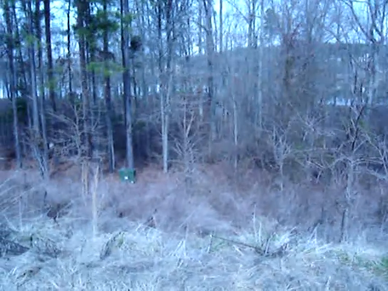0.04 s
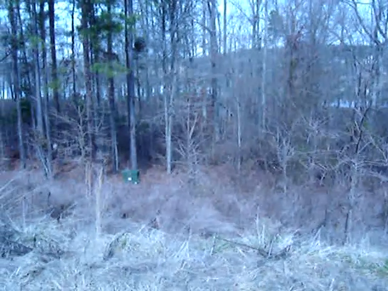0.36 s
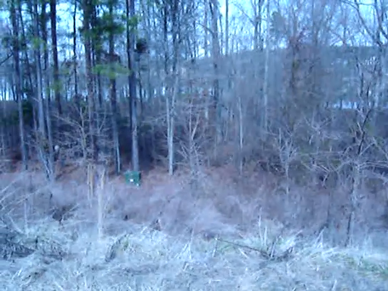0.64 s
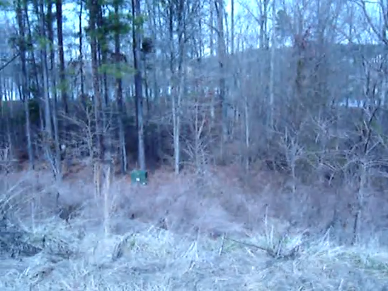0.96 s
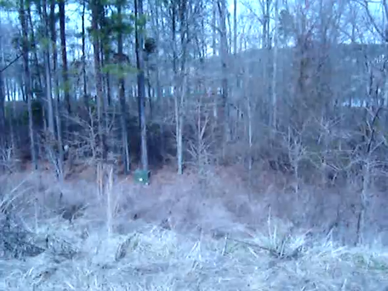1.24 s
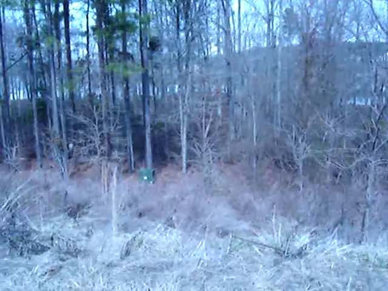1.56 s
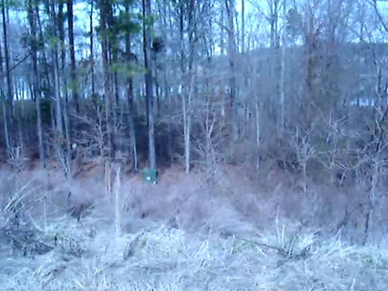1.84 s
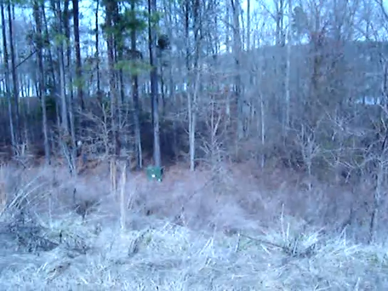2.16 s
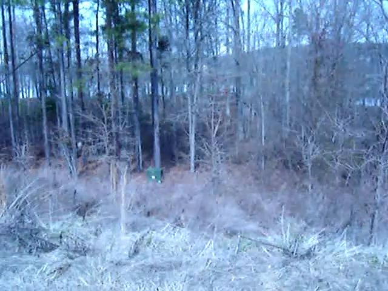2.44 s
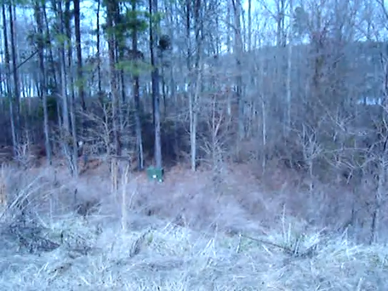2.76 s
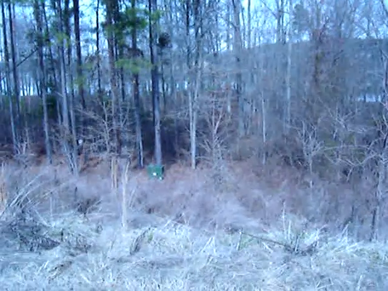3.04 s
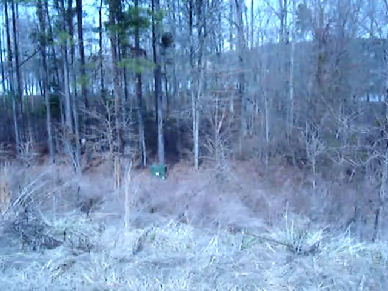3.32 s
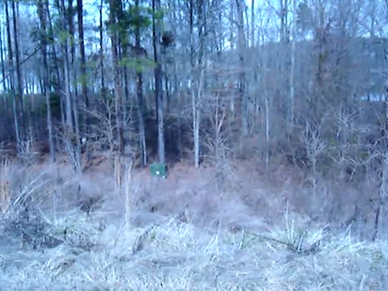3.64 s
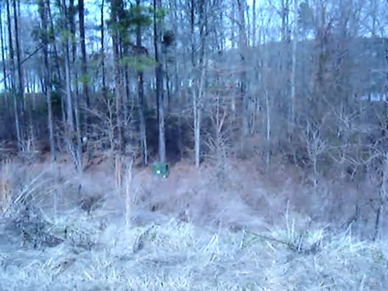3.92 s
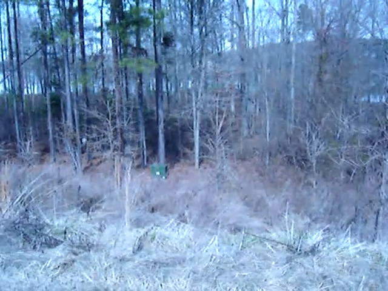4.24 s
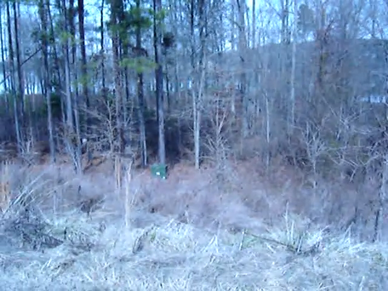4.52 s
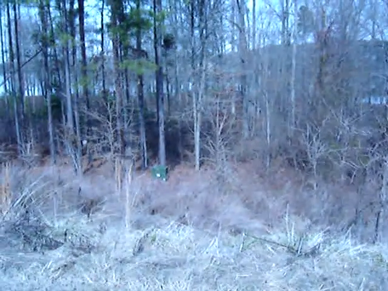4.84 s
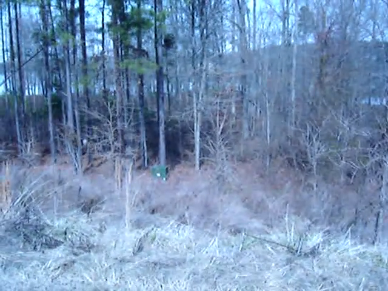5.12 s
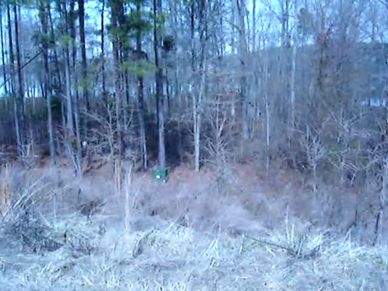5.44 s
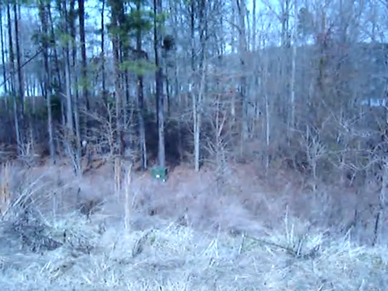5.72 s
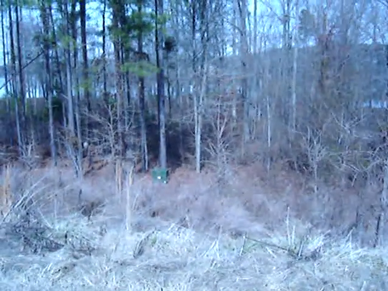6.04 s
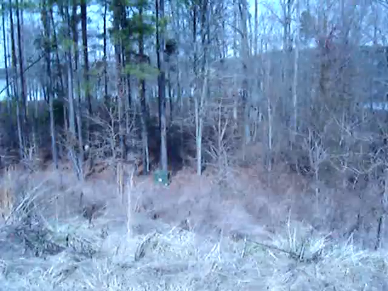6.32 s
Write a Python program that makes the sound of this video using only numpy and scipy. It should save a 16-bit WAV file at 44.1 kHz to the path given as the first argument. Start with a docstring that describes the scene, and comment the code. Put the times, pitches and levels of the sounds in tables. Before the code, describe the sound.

Chorus frogs call in overlapping, rising trills of dry clicks, with more frogs far off and light wind over a faint rumble and hiss.

```python
"""Chorus frogs call from a wet meadow at the edge of a wood. Each trill is a train of dry clicks, brief
resonances of the vocal sac, that climbs in pitch and slows. Grass and trunks scatter the clicks; behind
them are far frogs and a higher, diffuse wash of clicks. A faint low rattle comes twice; light wind bumps
the microphone over a distant rumble, a soft hiss, a faint hum and two small ticks."""
import sys
import numpy as np
from scipy import signal
from scipy.fft import rfft, irfft, next_fast_len
from scipy.io import wavfile
from scipy.ndimage import uniform_filter1d, map_coordinates

SR = 44100
rng = np.random.default_rng(int(sys.argv[2]) if len(sys.argv) > 2 else 0)


def inscribe(sig):
    """Save sig as 16-bit PCM at rate SR to the path in sys.argv[1].

    A 1-D sig is mono; a 2-D sig holds one channel per row.
    Samples are clipped to [-1, 1] before scaling.
    """
    pcm = np.round(np.clip(np.atleast_2d(sig).T, -1, 1) * 32767)
    wavfile.write(sys.argv[1], SR, pcm.astype(np.int16))


N = 285768


def amp(db):
    """The decibel law: 20 dB is a factor of ten in amplitude."""
    return 10 ** (np.asarray(db) / 20)

def unit(x):
    """Normalisation to an rms of 1."""
    return x / np.sqrt(np.mean(x ** 2) + 1e-20)

def seconds(length):
    """Uniform sampling: the time axis of a sound."""
    return np.arange(int(length * SR)) / SR

def along(points, hz):
    """Interpolation of (f/Hz, value) points on a logarithmic frequency axis."""
    f, values = np.transpose(points)
    return np.interp(np.log(hz + 1), np.log(f + 1), values)

def curves(rows):
    """Linear interpolation in time: one curve for each column after t/s."""
    times, *columns = np.transpose(rows)
    return [np.interp(np.arange(N) / SR, times, column) for column in columns]

def wobble(rate):
    """Band-limited fluctuation: a spline through `rate` random knots a second."""
    knots = rng.standard_normal(int(N * rate / SR) + 4)
    return map_coordinates(knots, [np.arange(N) * rate / SR])

def filtered(x, gain):
    """Zero-phase filtering: the spectrum is multiplied by gain(f)."""
    size = next_fast_len(N + 8192)
    return irfft(rfft(x, size) * gain(np.fft.rfftfreq(size, 1 / SR)), size)[:N]

def coloured(x, response):
    """Spectral shaping by a response of (f/Hz, gain/dB) points."""
    return filtered(x, lambda hz: amp(along(response, hz)))

def noise(spectrum):
    """Spectrally shaped Gaussian noise of rms 1."""
    return unit(coloured(rng.standard_normal(N), spectrum))

def add(track, s, sound):
    """Superposition of a sound on the track at time s."""
    start = round(s * SR)
    if 0 <= start < N:
        track[start:start + len(sound)] += sound[:N - start]

def swelling(t, peak_time, roundness):
    """A gamma envelope: power-law growth to 1 at peak_time, then exponential decay."""
    return (t / peak_time * np.exp(1 - t / peak_time)) ** roundness


# Spectrum of the distant rumble and hiss: f/Hz, relative level/dB
FLOOR_SPECTRUM = [(15, -32.5), (40, -15.5), (110, -0.5), (200, -4.5), (320, -12.5), (700, -13), (1300, -16),
                  (2000, -15.5), (4000, -23.5), (6300, -25), (10000, -28.5)]
# Tones of the hum: f/Hz, rms level/dB
HUM_TONES = [(145.3, -65), (180.1, -67), (8002, -83)]
# Small ticks: t/s, relative level/dB
TICK_EVENTS = [(1.6337, -37), (5.8702, -37)]

def background(floor_db, tick_db):
    """Ambient noise: a steady floor, tones wavering in level and phase, and two damped noise bursts."""
    now, t = np.arange(N) / SR, seconds(.03)
    hum, ticks = np.zeros(N), np.zeros(N)
    for hz, db in HUM_TONES:
        amplitude = np.sqrt(2) * amp(db + 1.2 * wobble(3.9))
        hum += amplitude * np.sin(2 * np.pi * hz * now + 0.3 * wobble(6.4))
    for s, db in TICK_EVENTS:
        add(ticks, s, amp(db + tick_db - 60 * t / .03))
    floor = amp(floor_db) * noise(FLOOR_SPECTRUM)
    return floor + hum + ticks * noise([(500, -11.5), (3500, -1.0), (9000, -10.5), (11000, -39)])


# Strength of the breeze's rumble and of the murmur of air: t/s, relative level/dB
RUMBLE_LEVELS = [(0.0, -61), (0.22, -63), (1.08, -58), (1.39, -62), (2.13, -53), (3.28, -60.5), (3.47, -60),
                 (3.75, -50), (4.0, -56.5), (4.71, -56), (4.91, -53.5), (5.34, -64), (5.9, -61.5),
                 (6.48, -63.5)]
AIR_LEVELS = [(0.0, -63.5), (0.05, -60.5), (0.14, -65.5), (0.92, -62.5), (0.99, -56), (2.02, -67.5),
              (2.09, -51), (3.07, -64), (3.72, -54.5), (4.44, -66.5), (4.78, -54), (5.94, -64), (6.12, -57),
              (6.48, -55)]
# Their spectra: f/Hz, relative level/dB
RUMBLE_SPECTRUM = [(10, -34.5), (25, -12), (45, 0), (75, 1.5), (120, -6.5), (200, -32.5), (400, -52)]
AIR_SPECTRUM = [(120, -15), (250, -0.5), (350, 4.5), (500, -4), (900, -30.5)]
# Eddies striking the microphone: t/s, relative level/dB
EDDIES = [(2.041, -38), (2.202, -36), (2.26, -32.5), (2.575, -36), (2.789, -41.5), (2.94, -36.5),
          (3.478, -37), (3.598, -31.5), (3.679, -33), (3.739, -31), (3.837, -36), (4.03, -39), (4.2, -38),
          (4.32, -42.5), (4.844, -33.5), (4.909, -34.5)]

def wind(rumble_db, air_db, puff_db, puff_time, flutter_db):
    """Turbulence: a light breeze flutters, and single eddies bump the microphone with their pressure."""
    (rumble,), (air,) = curves(RUMBLE_LEVELS), curves(AIR_LEVELS)
    eddies, t = np.zeros(N), seconds(.25)
    for s, db in EDDIES:
        add(eddies, s, amp(db + puff_db) * swelling(t, puff_time, 2.9))
    breeze = amp(rumble + rumble_db + flutter_db * wobble(13))
    return (breeze + eddies) * noise(RUMBLE_SPECTRUM) + amp(air + air_db) * noise(AIR_SPECTRUM)


# Runs of the rattle: first knock t/s, last knock t/s, relative level/dB
RATTLE_RUNS = [(0.418, 0.683, -44), (0.797, 1.189, -40), (1.283, 1.555, -41), (4.812, 5.254, -40.5),
               (5.289, 5.805, -41.5)]
# Modes of a knock: f/Hz, relative level/dB, decay time T60/s
KNOCK_MODES = [(524.7, -9.5, 0.27), (720, -3.5, 0.081), (821, 1.5, 0.052), (862, -6, 0.084),
               (1310, -14.5, 0.16), (1533, -14.5, 0.065)]
# Spectrum of the rasp: f/Hz, relative level/dB
RASP_SPECTRUM = [(300, -17), (700, 0.5), (1400, -5), (2000, -9), (4000, -8.5), (8000, -18.5), (10000, -30)]

def rattle(knock_gap_s, rasp_db):
    """Modal ringing: each hollow knock is a sum of damped modes; a soft rasp lies under each run."""
    knocks, t = np.zeros(N), seconds(.3)
    attack = 1 - np.exp(-t / 0.0061)
    now, in_run = np.arange(N) / SR, np.zeros(N)
    for first, last, db in RATTLE_RUNS:
        in_run[(now > first - .02) & (now < last + .06)] = 1  # the rasp leads and outlasts the knocks
        for s in np.linspace(first, last, round((last - first) / knock_gap_s) + 1):
            ring = np.zeros(len(t))
            for (hz, level, t60), excess_db in zip(KNOCK_MODES, rng.normal(0, 2, len(KNOCK_MODES))):
                cycles = hz * rng.normal(1, 0.0098) * t + rng.random()
                ring += amp(level + excess_db - 60 * t / t60) * np.sin(2 * np.pi * cycles)
            add(knocks, s, amp(db + rng.normal(0, 2)) * ring * attack)
    running = uniform_filter1d(in_run, SR // 20)
    roughness = amp(3 * wobble(90))
    return knocks + amp(rasp_db) * roughness * running * noise(RASP_SPECTRUM)


def scatter(sound, first_s, spread_s, count):
    """Multipath reflection from tufts and stems: unit energy in all, later paths tending to be weaker."""
    delays = np.minimum(rng.exponential(spread_s, count), 6 * spread_s)
    gains = rng.standard_normal(count) * np.exp(-delays / (2 * spread_s))
    paths = np.bincount(((first_s + delays) * SR).astype(int), gains / np.linalg.norm(gains))
    return signal.fftconvolve(sound, paths)


# Reverberation time of the wood: f/Hz, T60/s
WOOD_DECAY = [(1500, 0.73), (3000, 0.2), (6000, 0.23)]

def wood(x):
    """Diffuse reverberation among trunks: each quarter second of sound takes its own random paths."""
    echo, step = np.zeros(N), SR // 4
    for start in range(0, N, step):
        hz, t, spectra = signal.stft(rng.standard_normal(SR // 2), SR, nperseg=256)
        decay = amp(-60 * t / along(WOOD_DECAY, hz)[:, None])
        build_up = 1 - np.exp(-t / 0.0021)
        tail = signal.istft(spectra * decay * build_up, SR, nperseg=256)[1]
        add(echo, start / SR, signal.fftconvolve(x[start:start + step], tail / np.linalg.norm(tail)))
    return echo


# Side tones of the throat: ratio to the sac's frequency, relative level/dB
THROAT_TONES = [(0.449, -15), (0.562, -5), (1.39, -7.5), (1.55, -2.5)]

def click(db, hz, swell_s, throat_db):
    """Resonance: the vocal sac swells within a few cycles and rings out; the throat rings with it."""
    t = seconds(.016)
    envelope = amp(db) * swelling(t, np.clip(swell_s, .0008, .0028), roundness=1.94)
    sac = envelope * np.sin(2 * np.pi * hz * t)
    octave = amp(-25) * envelope ** 2 * np.sin(4 * np.pi * hz * t)  # only while the sac swings widely
    throat = np.zeros(len(t))
    for ratio, level in THROAT_TONES:
        strength = amp(level + rng.normal(0, 1.5))
        cycles = ratio * hz * rng.normal(1, .02) * t + rng.random()
        throat += strength * np.sin(2 * np.pi * cycles)
    return sac + octave + amp(throat_db) * throat * swelling(t, peak_time=0.0013, roundness=2.03)


# Transfer function of the way across the meadow: f/Hz, relative gain/dB
MEADOW_RESPONSE = [(1500, -3.5), (2200, -5.5), (2550, -2), (2900, 0.5), (3400, -3.5), (4200, 2.5),
                   (6000, -14)]

def blended_trills(start_hz, rise_hz, swell_s, wood_db, count):
    """Incoherent summation: trills, each swelling, rising and slowing, blend to an even level."""
    chorus = np.zeros(N)
    progress = np.linspace(0, 1, 20)
    for begin in np.linspace(-1, N / SR, count) + rng.uniform(-.1, .1, count):
        pitch = start_hz * (1 + rng.normal(0, 0.01))
        gaps = (.042 + .038 * progress) * rng.uniform(.85, 1.15)
        for s, share in zip(begin + np.cumsum(gaps), progress):
            db = 4 * np.sin(np.pi * share) + rng.normal(0, 1.4)
            pulse = click(db, pitch + rise_hz * share ** 2, swell_s, throat_db=-20.5)
            add(chorus, s, scatter(pulse, first_s=0, spread_s=.01, count=8))
    chorus = unit(coloured(chorus + amp(wood_db) * wood(chorus), MEADOW_RESPONSE))
    local_power = np.abs(uniform_filter1d(chorus ** 2, SR // 16))
    return chorus / np.sqrt(local_power + 1e-3)


# Strength behind the calls: t/s, relative level/dB of the far frogs and of the higher wash of clicks
BACKDROP_LEVELS = [(0.0, -46, -47.5), (0.49, -35, -43), (1.08, -37.5, -39), (1.39, -42.5, -45),
                   (1.66, -41, -51.5), (2.06, -39.5, -35.5), (2.49, -41.5, -43.5), (3.03, -36, -41.5),
                   (3.32, -39, -37.5), (3.52, -37.5, -45), (3.81, -37, -52), (4.06, -48, -46.5),
                   (4.37, -51, -40.5), (4.55, -47, -50), (5.43, -40, -55.5), (5.7, -39.5, -53.5),
                   (6.14, -39.5, -40), (6.48, -38, -44.5)]

def far_frogs_and_wash(wash_db):
    """Amplitude modulation: far frogs and a higher, diffuse wash of clicks each swell and fade."""
    far_level, wash_level = curves(BACKDROP_LEVELS)
    far = blended_trills(start_hz=2561.5, rise_hz=166, swell_s=0.0021, wood_db=-4.5, count=18)
    wash = blended_trills(start_hz=2870, rise_hz=302, swell_s=0.0018, wood_db=-6.0, count=14)
    return amp(far_level) * far + amp(wash_level + wash_db) * wash


def trill(start, end, count, slow_gap, last_gap, first_db, crest_db, last_db, first_hz, last_hz):
    """A modulated pulse train that swells, climbs and slows: rows of t/s, level/dB, f/Hz, progress."""
    progress = np.linspace(0, 1, round(count))
    gap_progress = np.linspace(0, 1, round(count) - 1)
    gaps = np.interp(gap_progress, [0, .52, .87, 1], [.81, 1, slow_gap, last_gap])
    times = start + (end - start) * np.append(0, np.cumsum(gaps)) / gaps.sum()
    levels = np.interp(progress, [0, .55, 1], [first_db, crest_db, last_db])
    pitches = first_hz + (last_hz - first_hz) * progress ** 1.27
    return list(zip(times, levels, pitches, progress))


# Trills: first and last t/s, number of clicks, slow and last gap (ratios to the middle gap),
# first, crest and last relative level/dB, first and last f/Hz
NEAR_TRILLS = [(0.0137, 0.8683, 18, 1.36, 1.24, -29, -14, -19, 2536, 3038),
               (0.0436, 1.2491, 19, 1.393, 1.203, -18.5, -10, -12.5, 2716, 3127),
               (1.368, 2.2167, 18, 1.43, 1.51, -27, -18, -17, 2600, 3020),
               (2.533, 3.467, 19, 1.41, 1.36, -28, -18.5, -17.5, 2655, 2970),
               (3.611, 4.4303, 17, 1.47, 1.27, -27.5, -16, -15.5, 2670, 2970),
               (3.669, 5.0536, 23, 1.44, 1.39, -26, -10.5, -13.5, 2725, 3142),
               (5.013, 5.444, 6, 1.18, 1.12, -33, -29.5, -30, 2480, 2576),
               (5.4342, 6.3465, 18, 1.4, 1.234, -28.5, -16.5, -18.5, 2554, 3040)]
# Clicks outside the trills: t/s, relative level/dB, f/Hz
SINGLE_CLICKS = [(0.882, -18.5, 3060), (0.9513, -20, 2650), (1.035, -22, 2690), (1.1366, -21.5, 2800),
                 (1.2092, -21.5, 2770), (2.237, -19.5, 3063), (2.4267, -27.5, 2790), (4.3914, -19.5, 2840),
                 (5.071, -19.5, 3156)]
# Scattering strength of the grass: f/Hz, gain/dB
GRASS_RESPONSE = [(1500, 3), (2600, 3), (3000, -3.5), (3350, 4.5), (3800, 4.5), (6000, -17)]

def near_frogs(ground_db, grass_db, wood_db, distance_slope):
    """Multipath propagation: clicks arrive directly, off the ground and by way of grass and trunks."""
    clear, grass = np.zeros(N), np.zeros(N)
    clicks = [row for call in NEAR_TRILLS for row in trill(*call)]
    clicks += [(*row, 0.43) for row in SINGLE_CLICKS]  # voiced as if 43 % into a trill
    loudest = max(row[1] for row in clicks)
    variations = rng.standard_normal((len(clicks), 3))
    for (s, db, hz, progress), (louder, higher, longer) in zip(clicks, variations):
        swell_s = (0.0016 + 0.0002 * progress) * np.exp(.15 * longer)
        throat_db = -38.5 + 0.35 * db + 10 * progress  # the throat gains as the trill goes on
        pulse = click(db + 0.67 * louder, hz * (1 + 0.011 * higher), swell_s, throat_db)
        farness = amp(distance_slope * min(loudest - db, 8))  # quieter: farther and more scattered
        add(clear, s, pulse)
        add(clear, s, farness * amp(ground_db) * scatter(pulse, first_s=.0035, spread_s=.002, count=3))
        add(grass, s, farness * amp(grass_db) * scatter(pulse, first_s=.009, spread_s=.012, count=12))
    return clear + coloured(grass + amp(wood_db) * wood(grass), GRASS_RESPONSE)


# Colour of the calls, with a dip near 1950 Hz and lifts near 3700 and 6100 Hz: f/Hz, gain/dB
VOICE_RESPONSE = [(1700, 2), (1950, -6.5), (2350, 0.5), (3000, 0.5), (3420, 3), (3680, 4), (3950, 0.5),
                  (4800, -2), (5350, 0.5), (6100, 8), (7000, -8)]

def frogs():
    """Source and filter: near calls, far calls and the wash share one spectral envelope."""
    near = near_frogs(ground_db=-11, grass_db=-17.5, wood_db=-4, distance_slope=0.8)
    return coloured(near + far_frogs_and_wash(wash_db=-2), VOICE_RESPONSE)


def scene():
    """Linear superposition: the frogs over the quiet sounds of the meadow, in one channel."""
    calls = frogs()
    breeze = wind(rumble_db=0.5, air_db=-1.5, puff_db=-6.5, puff_time=0.018, flutter_db=3.0)
    knocks = rattle(knock_gap_s=.0655, rasp_db=-55)
    return (calls + knocks + breeze + background(floor_db=-53.0, tick_db=-2.5))[None]

def record(dry):
    """Band limiting: the camera acts as an ideal low-pass filter."""
    return filtered(dry[0], lambda hz: hz < 10150)[None]


dry = scene()
out = record(dry)
inscribe(out)
```